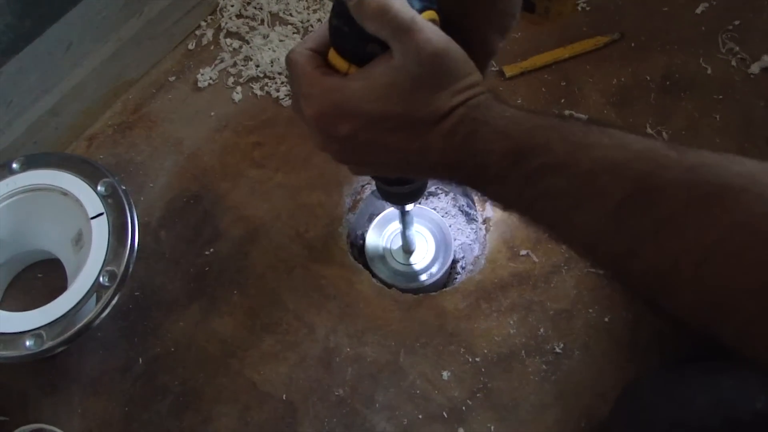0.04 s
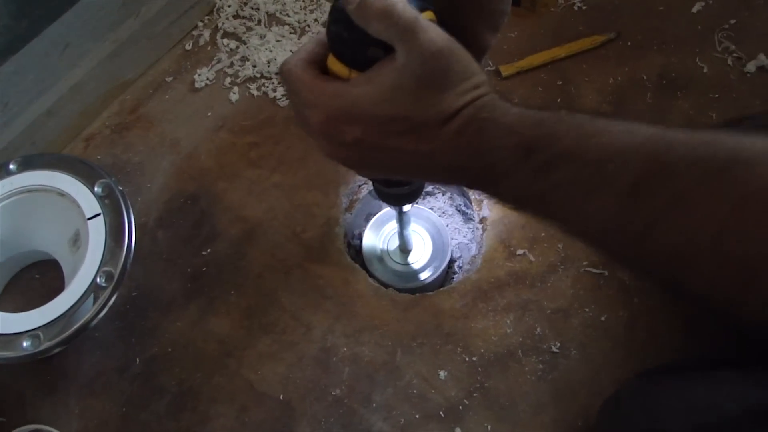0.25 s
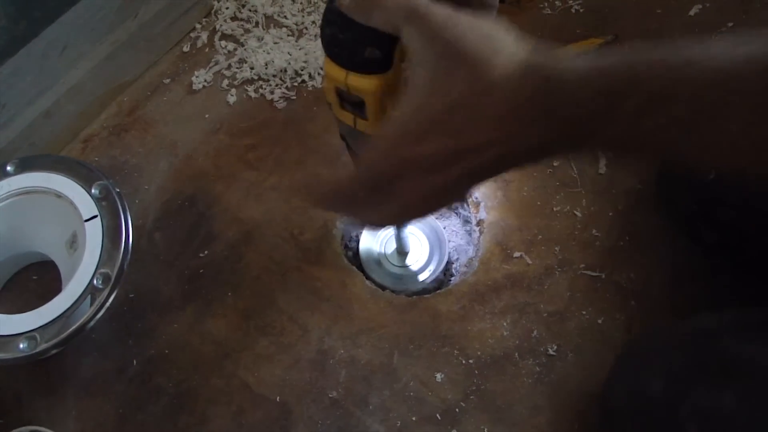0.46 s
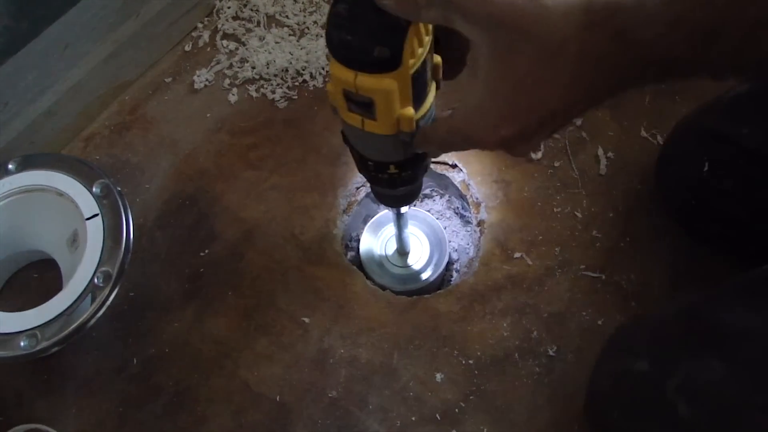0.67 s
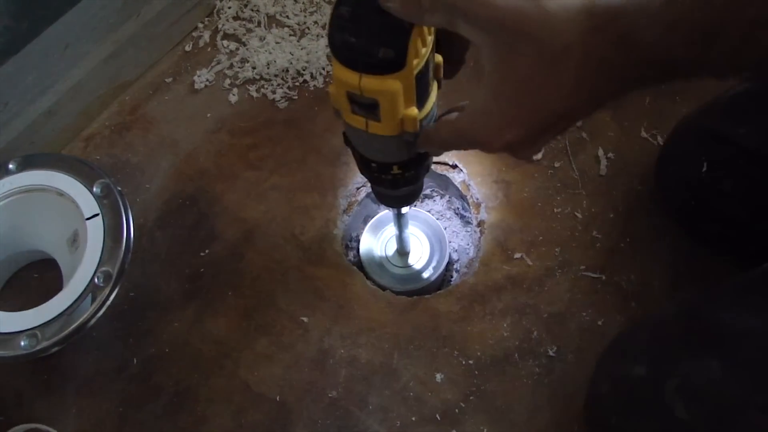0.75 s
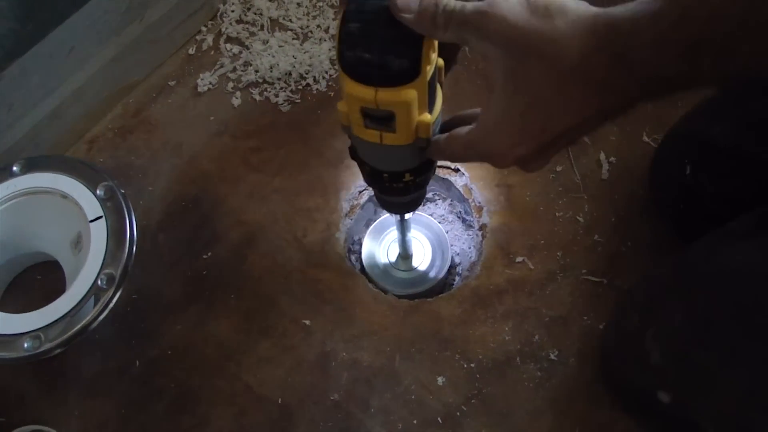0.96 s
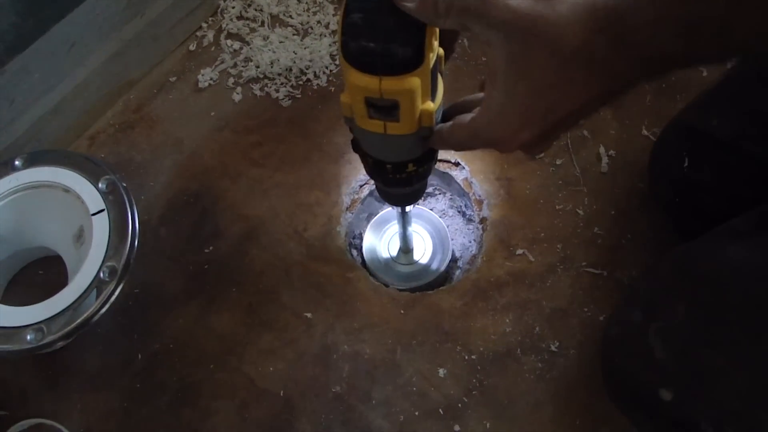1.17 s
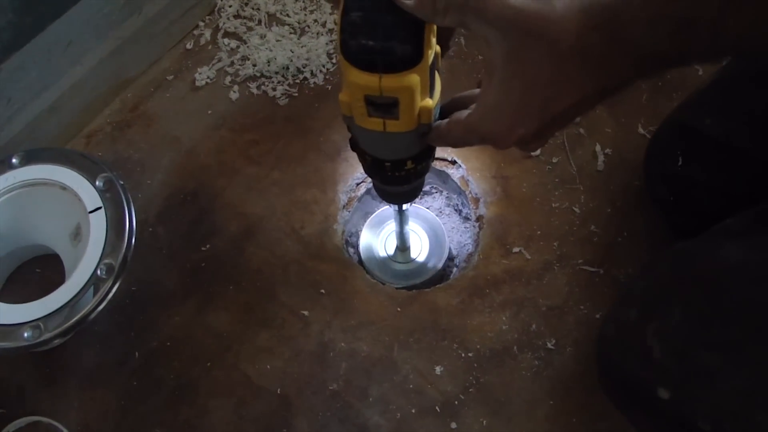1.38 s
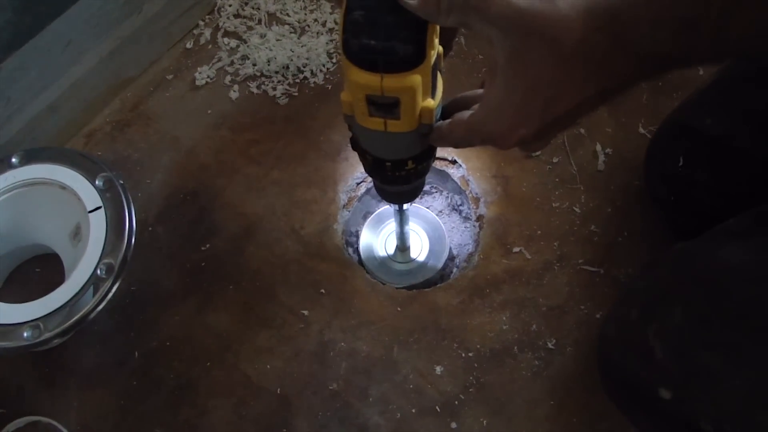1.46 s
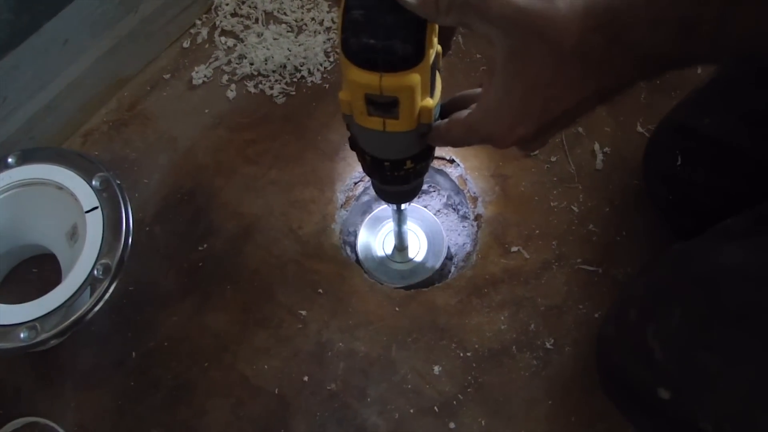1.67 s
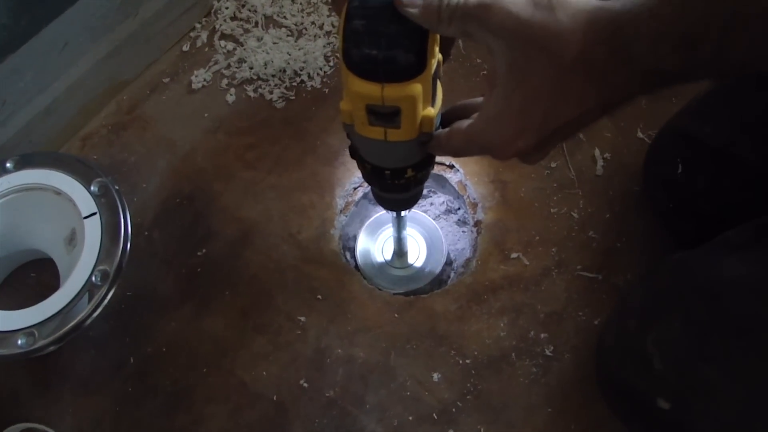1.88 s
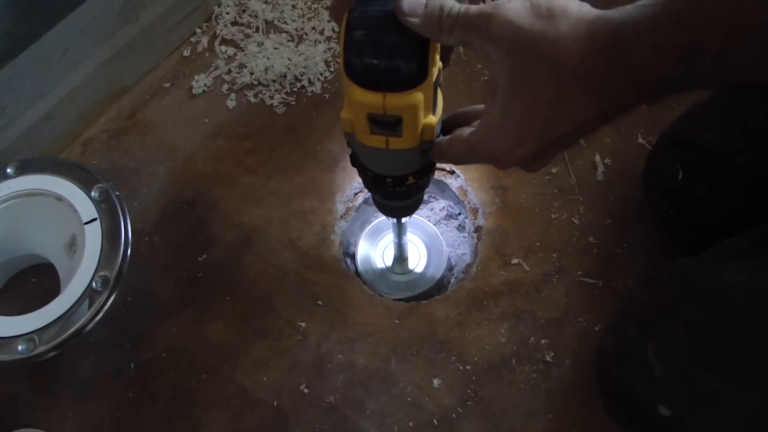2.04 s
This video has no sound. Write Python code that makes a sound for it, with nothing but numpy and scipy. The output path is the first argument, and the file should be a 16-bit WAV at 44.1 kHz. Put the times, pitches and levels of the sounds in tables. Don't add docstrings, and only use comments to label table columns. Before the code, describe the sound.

Cordless drill grinding plastic pipe indoors, steady gear whine, bright rasping, early knocks and two ticks

```python
import sys
import numpy as np
from scipy import signal
from scipy.fft import rfft, irfft, next_fast_len
from scipy.io import wavfile
from scipy.ndimage import uniform_filter1d

SR = 44100
rng = np.random.default_rng(int(sys.argv[2]) if len(sys.argv) > 2 else 0)


def elevation(decibels):
    levels = np.asarray(decibels, float)
    return 10 ** (levels / 20)


def dump_mix(stems):
    frames = np.atleast_2d(stems).T
    limited = np.clip(frames, -1, 1)
    pcm = np.round(limited * 32767).astype(np.int16)
    wavfile.write(sys.argv[1], SR, pcm)


N = 93183
TIME_S = np.arange(N) / SR
SIZE = next_fast_len(N)
HZ = np.fft.rfftfreq(SIZE, 1 / SR) + 1


def walk(rate_hz):
    hold = max(int(SR / rate_hz), 20)
    steps = rng.standard_normal(N // 20 + 2)[:N // hold + 1]
    slewed = uniform_filter1d(np.repeat(steps, hold), hold)
    slewed = uniform_filter1d(slewed, hold)[:N]
    return (slewed - slewed.mean()) / slewed.std()


def shaped(x, gain):
    return irfft(rfft(x, SIZE) * gain, SIZE)[:N]


def colour(table):
    hz, db = np.transpose(table)
    return elevation(np.interp(np.log(HZ), np.log(hz), db))


def resonance(hz, width_hz):
    return 1 / (1 + (2 * (HZ - hz) / width_hz) ** 2)


def pulse(at_s, width_ms, undershoot):
    u = ((TIME_S - at_s) * 1000 / width_ms) ** 2
    return (1 - undershoot * u) * np.exp(-u / 2)


# time in seconds, output gear mesh in Hz, output mesh in dB, input mesh in dB,
# sidebands in dB, scrape in dB, cutter wobble (about 0-1).
DRIVE_CONTROLS = [(0, 1552, -31, -28, -31, -22.5, 1.46), (0.121, 1539, -38, -25.5, -30.5, -24.5, 0.68),
                  (0.249, 1504, -33, -30, -28, -24, 0.9), (.35, 1562, -33, -28, -32.5, -22.5, 1),
                  (.5, 1611, -27.5, -28, -31, -22, 0.42), (.65, 1646, -31, -31.5, -28, -22.5, .9),
                  (.8, 1586, -30.5, -28, -29.5, -23, 0.99), (.92, 1499, -35.5, -29, -29.5, -23.5, 0.63),
                  (1.05, 1386, -32.5, -29.5, -37, -22, 0.42), (1.2, 1392, -50, -26.5, -34, -23.5, 0.42),
                  (1.299, 1284, -33.5, -30.5, -37, -23.5, 0.22), (1.4, 1250, -36.5, -28.5, -36, -22, 0.1),
                  (1.6, 1232, -36.5, -27, -36, -23, 0.24), (1.751, 1177, -34, -30, -32.5, -23, 0.21),
                  (1.9, 1191, -36, -30.5, -34.5, -22.5, 0.22), (2.11, 1215, -39, -32, -36, -23.5, 0.19)]


def drive(control):
    columns = ("s", "output_hz", "output_db", "input_db", "sideband_db", "scrape_db", "wobble")
    table = np.array(DRIVE_CONTROLS)
    curve = np.interp(TIME_S, table[:, 0], table[:, columns.index(control)])
    return uniform_filter1d(curve, size=1500)


def room(near):
    t60_s, level_db, first_echo_s = 0.27, -13.5, 0.004
    t = np.arange(SR // 2) / SR
    tail = rng.standard_normal(len(t)) * elevation(-60 * t / t60_s) * (t > first_echo_s)
    tail /= np.sqrt(np.sum(tail ** 2))
    return elevation(level_db) * signal.fftconvolve(near, tail)[:N]


# time in seconds, level in dB, width in ms.
CHIP_SNAPS = [
    (.9457, -5, .017),
    (.9884, -3, .04),
]


def snaps():
    return sum(elevation(db) * pulse(at_s, width_ms, undershoot=0.88) for at_s, db, width_ms in CHIP_SNAPS)


# time in seconds, level in dB, width in ms.
TOOL_JOLTS = [
    (.003, -30, .7),
    (.169, -21, .3),
    (.368, -27, .4),
    (.737, -28, .35),
]


def jolts():
    return sum(elevation(db) * pulse(at_s, width_ms, undershoot=1) for at_s, db, width_ms in TOOL_JOLTS)


# time in seconds, level in dB, bass share of the blow in dB.
WALL_KNOCKS = [(0.17, -31, -6), (0.324, -36, -10), (0.372, -30, -10), (0.42, -35, -10), (0.464, -33, -10),
               (0.511, -32, -11), (0.648, -31, -7), (0.693, -37, -3), (0.74, -32, -8), (0.791, -35, -5),
               (0.836, -38, -1), (0.936, -35, -5)]
# frequency in Hz, level in dB, t60 in seconds.
WALL_MODES = [(270, -5, .05), (400, -3, .03), (480, -1, .04), (570, -1, .05), (828, 0, .09), (900, -4, .05),
              (1100, -6, .03)]


def knocks():
    bass_below_hz, rise_s, mode_spread_db = 700, 0.0011, 0.5
    out = np.zeros(N + SR)
    t = np.arange(SR // 4) / SR
    for at_s, db, bass_db in WALL_KNOCKS:
        ring = np.zeros(len(t))
        for hz, mode_db, t60_s in WALL_MODES:
            level_db = mode_db + mode_spread_db * rng.standard_normal() + bass_db * (hz < bass_below_hz)
            ring += elevation(level_db - 60 * t / t60_s) * np.sin(2 * np.pi * hz * t)
        start = int(at_s * SR)
        out[start:start + len(t)] += elevation(db) * ring * (1 - np.exp(-t / rise_s))
    return out[:N]


def rasp():
    band = shaped(rng.standard_normal(N), resonance(hz=4700, width_hz=420))
    return elevation(-39.5) * np.clip(drive("wobble"), 0, 2) * band / band.std()


# frequency in Hz, level in dB.
SCRAPE_COLOUR = [(40, -45), (130, -50.5), (230, -32), (536, -22.5), (1050, -16.5), (1300, -14.5),
                 (2900, -6.5), (10800, -14)]
# frequency in Hz, width in Hz, level over the scrape in dB.
PIPE_RESONANCES = [(271, 29, 4.5), (554, 73, 6.5), (715, 37, -7), (1202, 146, 5), (1670, 180, 1.5),
                   (1800, 67, 5.5), (2370, 45, 2.5), (3730, 1200, 0.5), (4190, 200, 4.5), (4720, 400, 4),
                   (5280, 320, 2.5), (8640, 640, 2), (11000, 740, 2)]


def scrape(chuck):
    rumble_hz, rumble_db, wobble_db = 720, 10.5, 2
    grit_db, grit_rate_hz, flicker_db, flicker_rate_hz = 0.6, 1500, 1.03, 13.8
    pipe_db = sum(db * resonance(hz, width_hz) for hz, width_hz, db in PIPE_RESONANCES)
    grit = rng.standard_normal(N) * elevation(grit_db * walk(grit_rate_hz))
    grit = shaped(grit, colour(SCRAPE_COLOUR) * elevation(pipe_db))
    grit /= grit.std()
    wobble = drive("wobble")
    out = 0
    for octave in range(5, 15):
        band = shaped(grit, np.clip(1 - abs(np.log2(HZ) - octave), 0, 1))
        low = 1 / (1 + (2 ** octave / rumble_hz) ** 2)
        swell_db = wobble * low * (rumble_db + wobble_db * chuck)
        flicker = (1 + 2 * low) * flicker_db * walk(flicker_rate_hz)
        out = out + band * elevation(swell_db + flicker)
    return out * elevation(drive("scrape_db"))


def teeth(turns, orders, lines):
    out = 0
    for order, (db, blur_hz, clean) in zip(orders, lines):
        pole = np.exp(-np.pi * blur_hz / SR)
        noise = rng.standard_normal((2, N + SR // 10))
        blur = signal.lfilter([1], [1, -2 * pole, pole ** 2], noise)[:, -N:]
        blur *= np.sqrt(1 - clean) / blur.std()
        phase = 2 * np.pi * order * turns
        tone = (np.sqrt(2 * clean) + blur[0]) * np.cos(phase) + blur[1] * np.sin(phase)
        out = out + elevation(db) * tone
    return out


OUTPUT_MULTIPLES = (1, 2.005)
LOADED_MULTIPLES = (.965, 1.04)
INPUT_MULTIPLES = (2.278, 4.55, 6.82, 1.17)
SIDEBAND_MULTIPLES = (2.148, 1.547, 2.66, 2.96, 4.4)
# level in dB, blur in Hz, clean share 0-1.
OUTPUT_TONES = [(-0.5, 190, 0.72), (-4.5, 80, 0.43)]
LOADED_TONES = [(-8, 56, 0.32), (-7, 55, 0.33)]
INPUT_TONES = [(0.5, 160, 0.39), (-12, 180, 0.081), (-9, 470, .05), (-7.5, 128, 0.087)]
SIDEBAND_TONES = [(1.5, 196, 0.26), (-16.5, 47, 0.69), (-5, 98, 0.11), (-4.5, 120, .05),
                  (-16.5, 150, 0.078)]
# frequency in Hz, level in dB.
HOUSING_COLOUR = [(1200, 0.5), (1500, -4), (1630, 0.5), (1950, -2), (2400, 0), (8700, 0), (9800, -6),
                  (12000, -4)]


def gears(turns, chuck):
    mesh_per_carrier_turn, carrier_throb, chuck_throb_db = 27.45, 0.17, 3
    carrier = 2 * np.pi * turns / mesh_per_carrier_turn
    phases = 2 * np.pi * rng.random(5)
    pattern = sum(np.cos(k * carrier + phase) for k, phase in enumerate(phases, 1))
    steadiness = np.clip(1 - drive("wobble"), 0, 1)
    strands = steadiness * teeth(turns, LOADED_MULTIPLES, LOADED_TONES)
    output = teeth(turns, OUTPUT_MULTIPLES, OUTPUT_TONES) + strands
    output = output * elevation(drive("output_db") + chuck_throb_db * chuck)
    mesh = elevation(drive("input_db")) * teeth(turns, INPUT_MULTIPLES, INPUT_TONES)
    sidebands = elevation(drive("sideband_db")) * teeth(turns, SIDEBAND_MULTIPLES, SIDEBAND_TONES)
    whine = output + (1 + carrier_throb * pattern) * (mesh + sidebands)
    return shaped(whine, colour(HOUSING_COLOUR))


def scene():
    mesh_per_chuck_turn, chuck_phase_turns = 75, 0.24
    mic_top_hz, steep_edge_hz = 11120, 13050
    turns = np.cumsum(drive("output_hz") * (1 + 0.00294 * walk(30))) / SR
    chuck = np.cos(2 * np.pi * (turns / mesh_per_chuck_turn + chuck_phase_turns))
    near = gears(turns, chuck) + knocks() + jolts()
    tool = near + room(near) + scrape(chuck) + rasp()
    tool = signal.sosfilt(signal.butter(8, mic_top_hz, fs=SR, output="sos"), tool)
    tool = signal.sosfilt(signal.ellip(10, 0.3, 70, steep_edge_hz, fs=SR, output="sos"), tool)
    return (tool + snaps())[None]


def low_pass(x):
    return signal.sosfilt(signal.butter(12, 15750, fs=SR, output="sos"), x)


def record(dry):
    mix = signal.sosfilt(signal.butter(2, 122, "high", fs=SR, output="sos"), dry)
    return low_pass(mix)


dry = scene()
out = record(dry)
dump_mix(out)
```